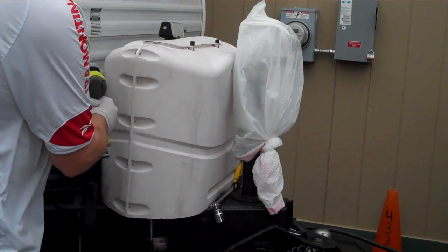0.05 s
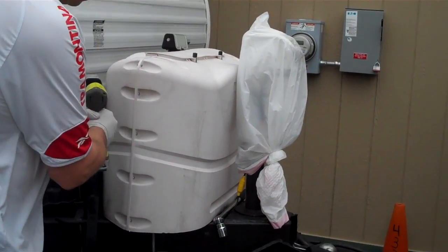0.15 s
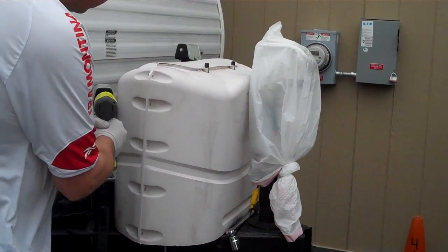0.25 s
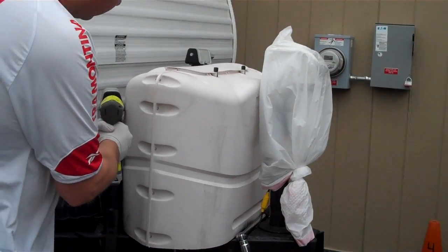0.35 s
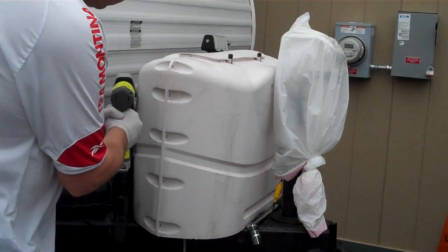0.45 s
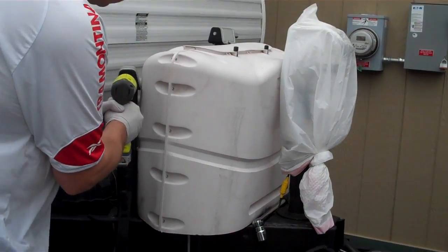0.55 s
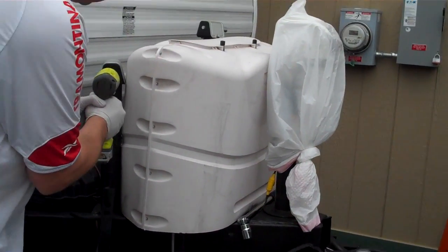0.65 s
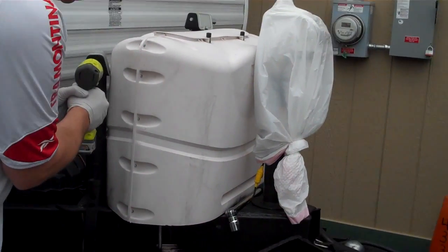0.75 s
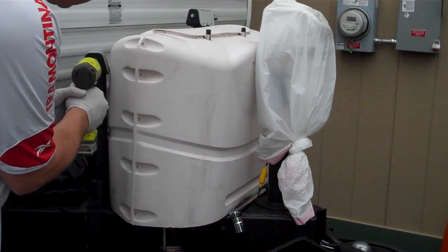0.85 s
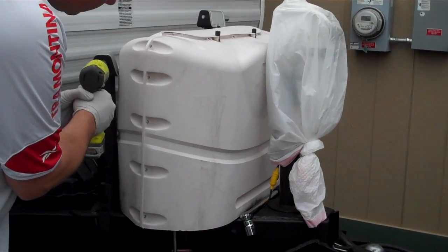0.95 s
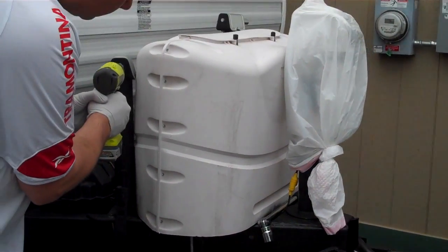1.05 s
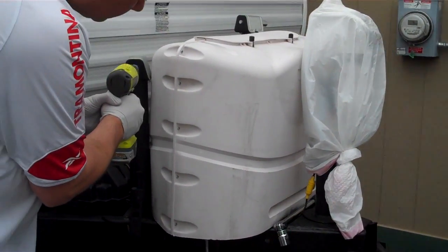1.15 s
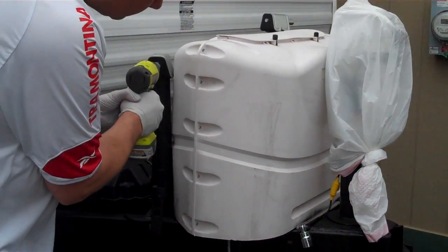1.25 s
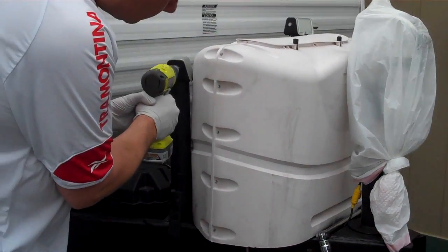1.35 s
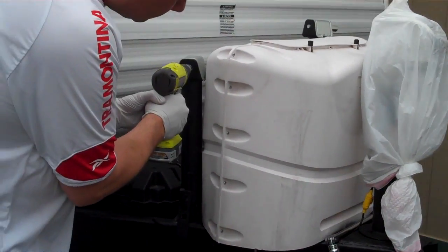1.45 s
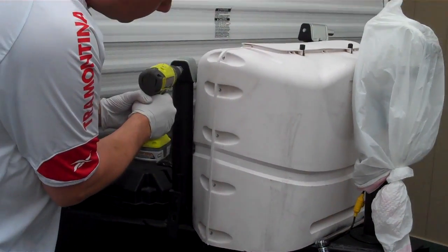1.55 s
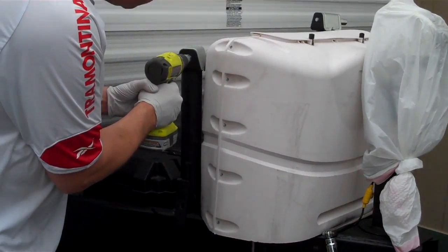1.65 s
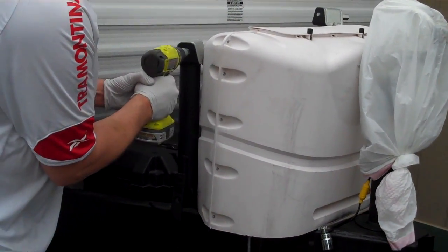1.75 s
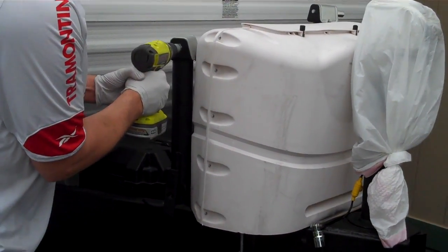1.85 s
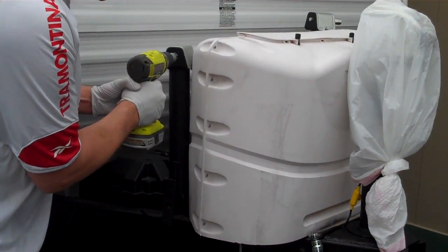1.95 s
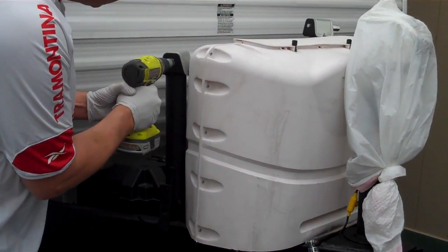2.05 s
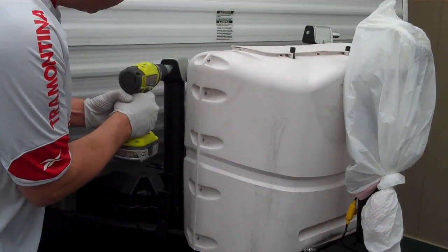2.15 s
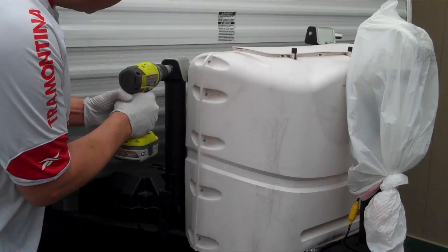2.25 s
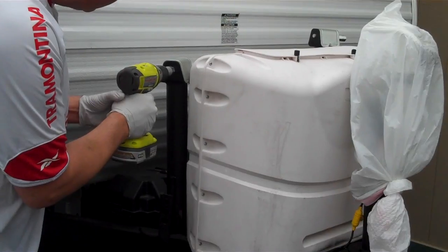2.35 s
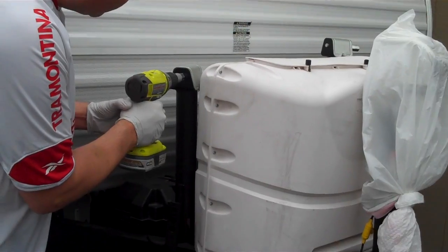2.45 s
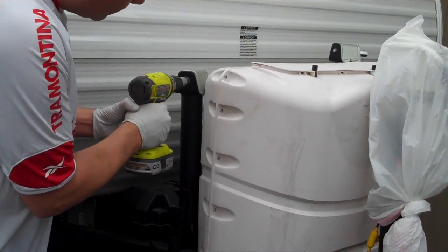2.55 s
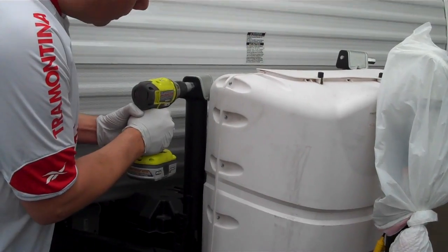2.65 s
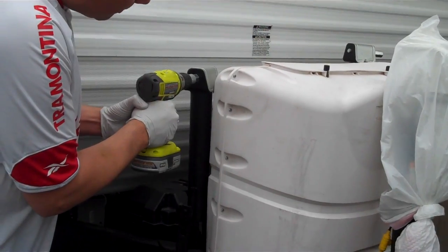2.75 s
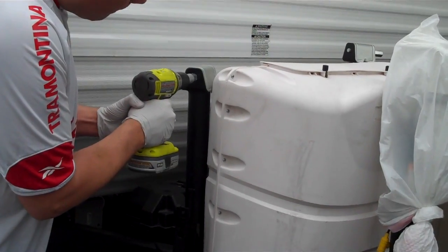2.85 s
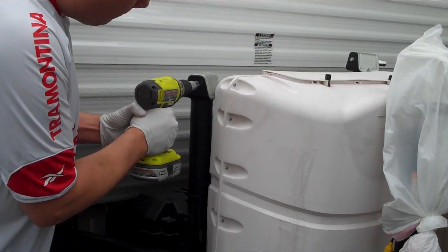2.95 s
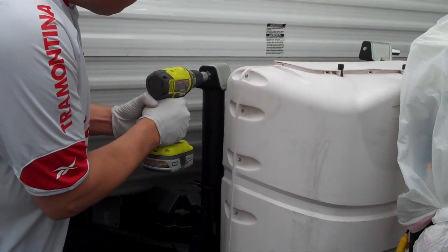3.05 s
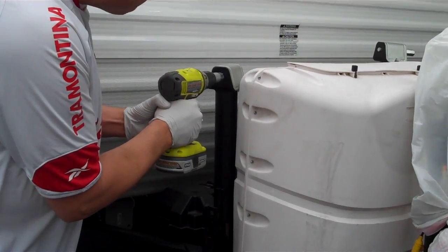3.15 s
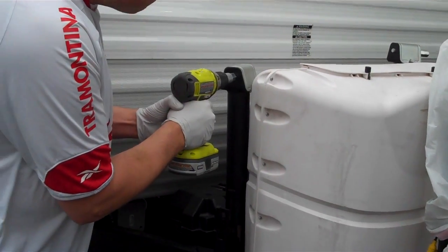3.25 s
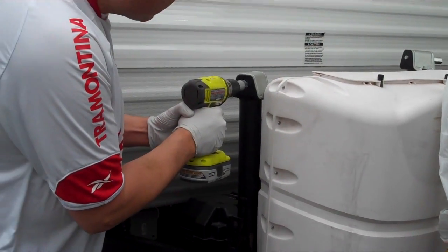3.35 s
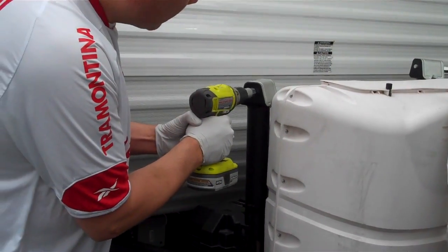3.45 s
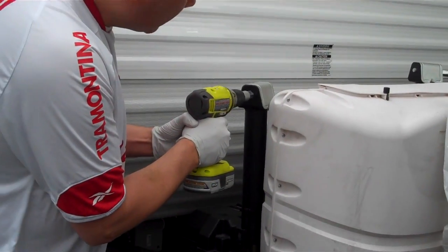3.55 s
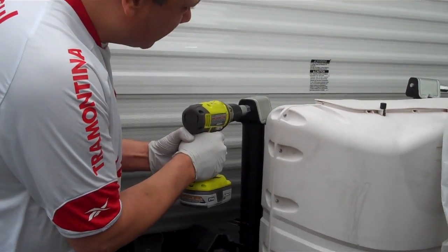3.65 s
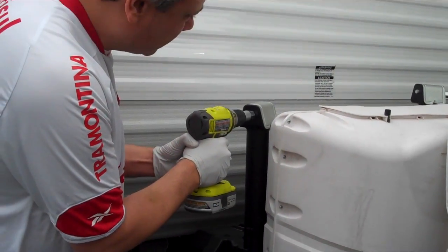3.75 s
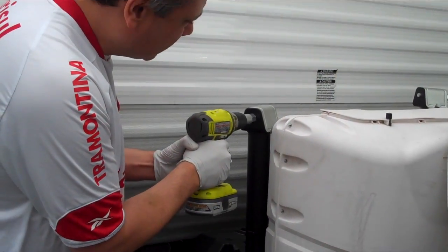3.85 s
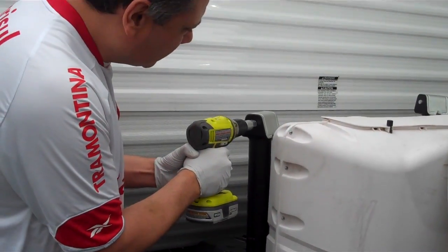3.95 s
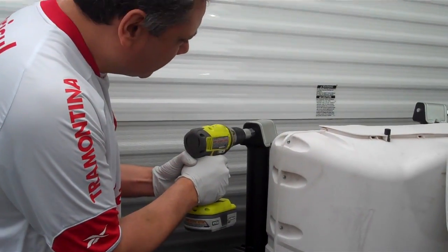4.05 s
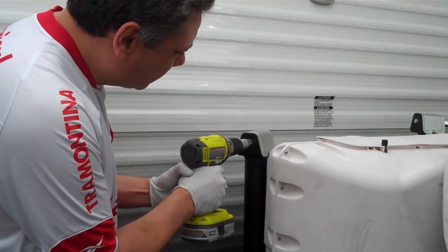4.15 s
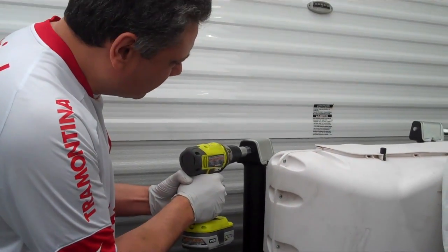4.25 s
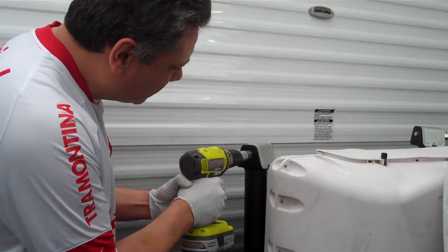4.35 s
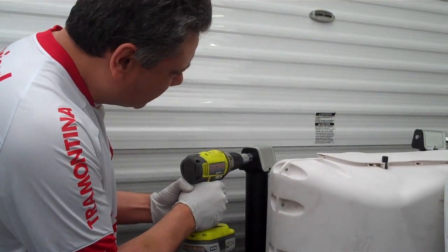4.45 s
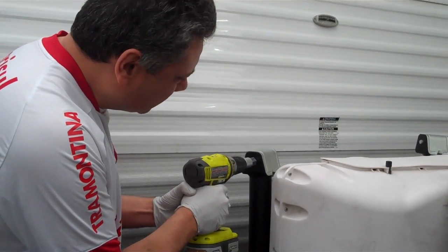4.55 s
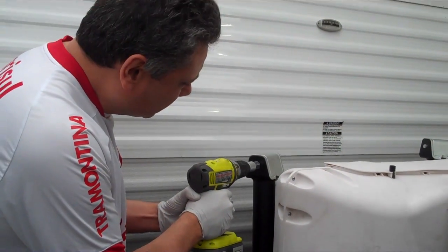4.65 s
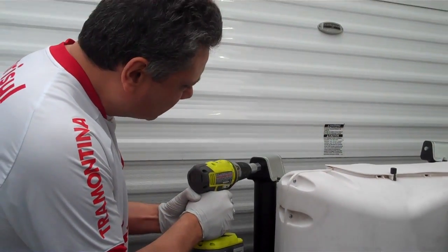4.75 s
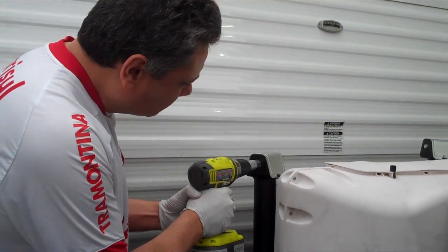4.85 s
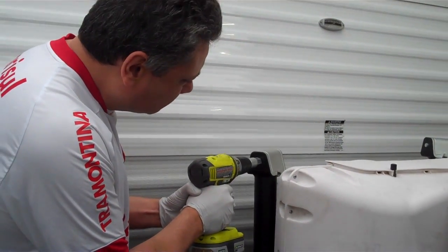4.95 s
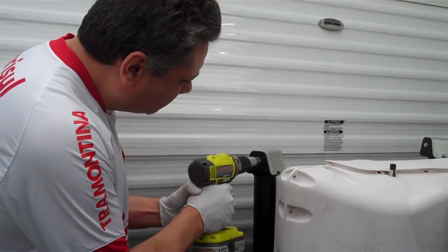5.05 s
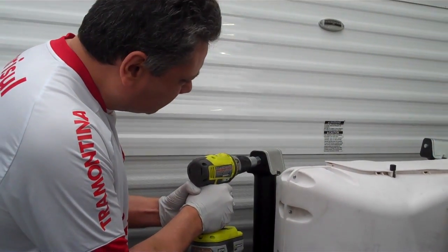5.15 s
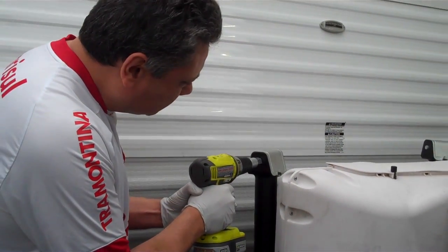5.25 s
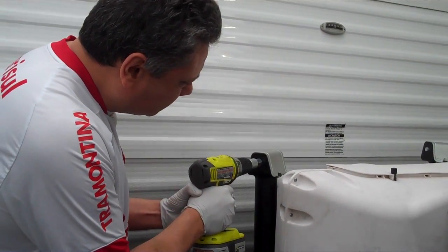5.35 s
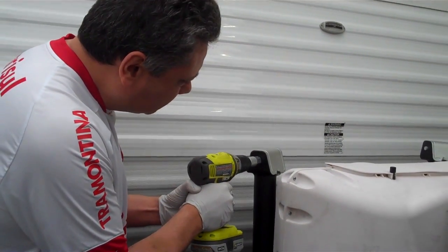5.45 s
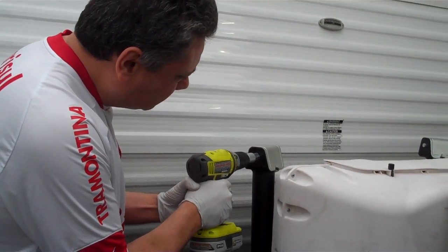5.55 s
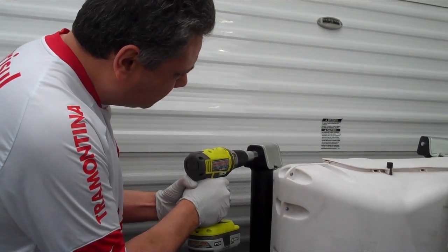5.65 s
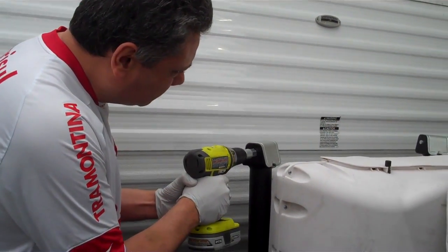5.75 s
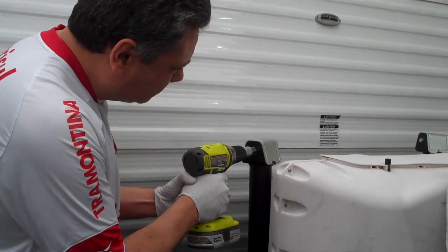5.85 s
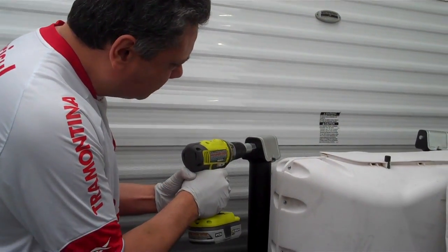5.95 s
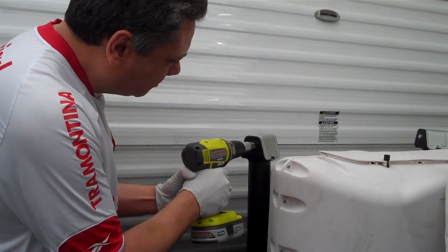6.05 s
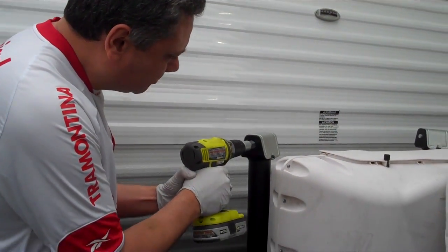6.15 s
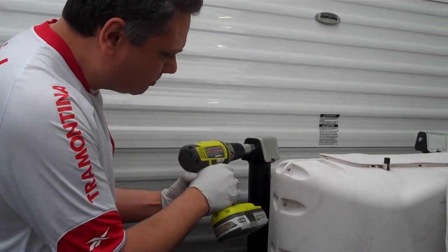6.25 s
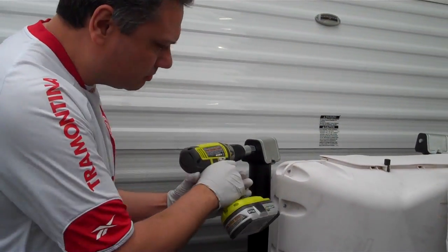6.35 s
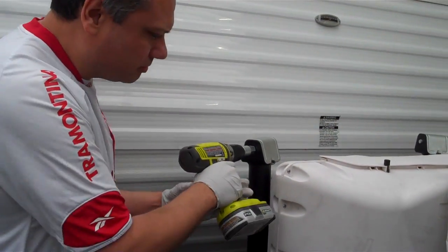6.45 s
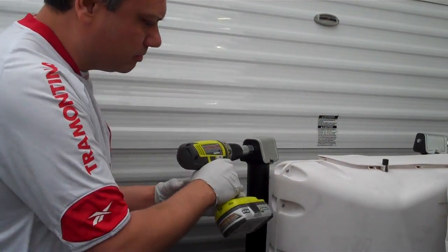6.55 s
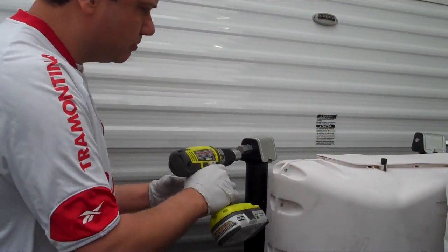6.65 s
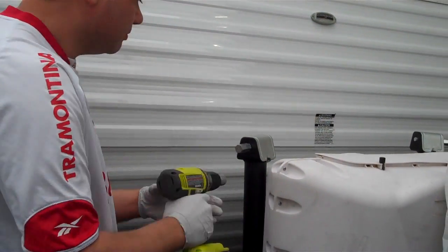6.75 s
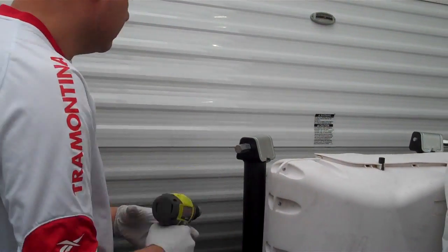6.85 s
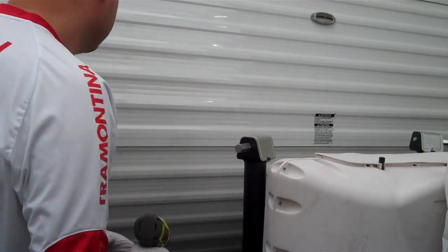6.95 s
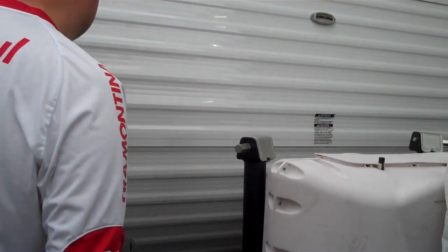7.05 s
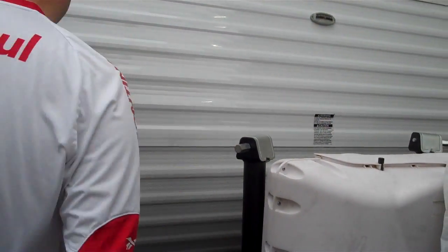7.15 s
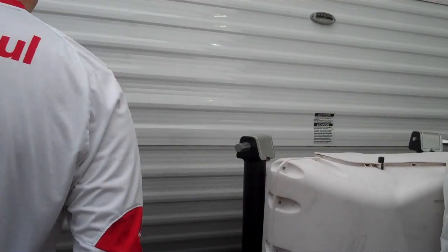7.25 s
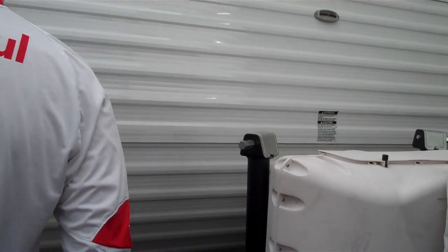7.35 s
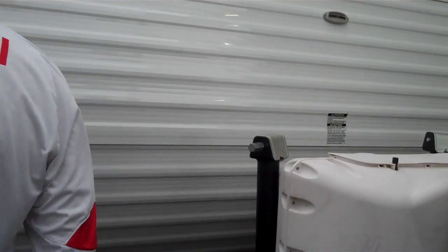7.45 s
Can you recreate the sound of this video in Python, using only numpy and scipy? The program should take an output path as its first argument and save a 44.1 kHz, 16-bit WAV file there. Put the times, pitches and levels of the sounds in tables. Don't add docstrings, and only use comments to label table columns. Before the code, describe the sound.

Outdoors, a cordless drill whines loudly and steadily, bogs down under load with rhythmic lurches, stops abruptly, then metal knocks and scrapes follow.

```python
import sys
import numpy as np
from scipy import signal
from scipy.fft import rfft, irfft
from scipy.io import wavfile
from scipy.ndimage import uniform_filter1d

SR = 44100
rng = np.random.default_rng(int(sys.argv[2]) if len(sys.argv) > 2 else 0)


def field_ratio(decibels):
    return 10 ** (np.asarray(decibels, dtype=float) / 20)


def wrap_up_sound(samples):
    columns = np.atleast_2d(samples).T
    tamed = np.clip(columns, -1, 1)
    steps = np.round(tamed * 32767).astype(np.int16)
    wavfile.write(sys.argv[1], SR, steps)


N = 330750

MESH = 11.25
# time in seconds, treble level in dB.
GEAR_RATTLE = [(0, -44), (.03, -35.5), (.8, -35), (1.78, -34), (3.56, -33.5), (4.62, -33), (5.23, -34.5),
               (6.46, -34), (6.485, -39.5), (6.52, -70)]


def curves(table):
    s, *columns = np.transpose(table)
    return [np.interp(np.arange(N) / SR, s, c) for c in columns]


def through(hz, body):
    f, db = np.transpose(body)
    return np.interp(np.log(hz), np.log(f), db)


def peaks(times, db, rise, fall):
    d = np.arange(N) / SR - np.c_[times]
    return np.c_[db] - np.where(d < 0, -rise * d, np.c_[fall] * d)


def unit(x):
    return x / np.sqrt(np.mean(x ** 2))


def band(x, lo_hz, hi_hz):
    return signal.sosfilt(signal.butter(2, [lo_hz, hi_hz], "bandpass", fs=SR, output="sos"), x)


def colour(x, spectrum, bumps=()):
    hz, db = np.transpose(spectrum)
    f = np.fft.rfftfreq(len(x), 1 / SR) + 1
    shape_db = np.interp(np.log(f), np.log(hz), db)
    for centre, width, gain_db in bumps:
        shape_db += gain_db * np.exp(-((f - centre) / width) ** 2)
    return irfft(rfft(x) * field_ratio(shape_db), len(x))


def walk(rate):
    k = max(int(SR / rate), 2)
    held = np.repeat(rng.standard_normal(N // k + 1), k)
    return unit(uniform_filter1d(uniform_filter1d(held, k), k)[:N])


def grit(scatter_db):
    return unit(rng.standard_normal(N) * field_ratio(scatter_db * walk(900)))


def ring(hz, t60, seconds=.25):
    t = np.arange(int(seconds * SR)) / SR
    return np.sin(2 * np.pi * hz * t) * np.exp(-np.log(1000) * t / max(t60, .003))


def add(out, s, x):
    i = int(s * SR)
    out[i:i + len(x)] += x[:len(out) - i]


def drill():
    # frequency in Hz, level in dB.
    mesh_body = [(1700, -40), (2250, -33), (2420, -36.5), (2500, -33), (2620, -37), (2760, -27),
                 (3050, -23.5), (3350, -43)]
    octave_body = [(2200, -52), (2800, -26), (3750, -23), (4250, -32), (4420, -28.5), (5370, -30),
                   (5520, -34), (6400, -41)]
    # time in seconds, tooth contact in dB, rotor slot tone in dB.
    tone_levels = [(0, -13, -55), (.055, 0, -36), (.075, 15, -39), (.1, -4, -47), (.2, 0, -40.5), (.6, 3, -35),
                   (.85, -10, -36), (1.05, -4, -33), (1.45, 1, -29.5), (1.7, -20, -32), (2.45, -28, -32.5),
                   (2.7, -2, -31), (3.1, -6, -32.5), (3.5, 1, -40.5), (3.9, -7, -41.5), (4.17, 8.5, -41),
                   (4.4, -2.5, -39), (6.5, -0.5, -42)]
    shaft_hz, load, torque, tight = shaft()
    turns = np.cumsum(shaft_hz) / SR
    noise, running_db = rattle(turns, load)
    contact_db, slot_db = curves(tone_levels)
    braked_db = -np.clip(175 - shaft_hz, 0, 25) * load
    patchy_db = .6

    mesh_db = through(MESH * shaft_hz, mesh_body) + contact_db + braked_db + patchy_db * walk(12)
    mesh_db += 4.5 * load * tight
    octave_db = through(2 * MESH * shaft_hz, octave_body) + patchy_db * walk(12)
    octave_db += -20 * (1 - torque)
    octave_db -= np.clip(165 - shaft_hz, 0, 60) / 12 * load + 9 * np.exp(-turns / 8)
    slot_db = slot_db + braked_db + 3 * np.exp(-turns / 200) * walk(20.1)

    on = np.clip((GEAR_RATTLE[-1][0] - np.arange(N) / SR) / 0.018, 0, 1)
    tones = whine(turns, load, running_db, shaft_hz, mesh_db, octave_db, slot_db)
    return noise * on, tones * on


def shaft():
    # time in seconds, shaft rate in Hz.
    speed = [(0, 298), (.28, 297), (.45, 302), (.8, 317.5), (1.45, 317.2), (1.63, 320.8), (2.45, 320),
             (2.65, 318.4), (3.33, 317.8), (3.65, 314.5), (3.85, 317.3), (4.05, 315), (4.65, 270),
             (5.07, 250), (5.495, 225.4), (6.1, 203.5), (6.38, 189), (6.45, 173)]
    free_hz, loaded_hz = 323, 224.5
    start_lag_hz, start_s, inrush_s = 215, .06, .055
    brake_at_s, brake_s = 6.452, .055
    crank_per_turn, tight_at_s, tight_sharp = 1 / 52.25, 5.452, 2.2
    hunt = .0012
    t = np.arange(N) / SR
    hz = curves(speed)[0]
    sag = np.maximum(max(np.transpose(speed)[1]) - 3 - hz, 0) * (t > 1)
    depth = .0055 + .00035 * sag
    crank = crank_per_turn * np.cumsum(hz * (1 - .29 * depth)) / SR
    angle = 2 * np.pi * (crank - crank[int(tight_at_s * SR)])
    tight = np.exp(tight_sharp * (np.cos(angle) - 1))
    hz = (hz - start_lag_hz * np.exp(-t / start_s)) * (1 - depth * tight)
    hz = hz * (1 + hunt * (1 + 5 * np.exp(-t / .45) + sag / 40) * walk(14))
    hz = np.maximum(hz * np.exp(-np.maximum(t - brake_at_s, 0) / brake_s), 50)
    load = np.clip((free_hz - hz) / (free_hz - loaded_hz), 0, 1) * (t > 1)
    torque = np.maximum(load, np.exp(-(t / inrush_s) ** 4))
    return hz, load, torque, tight


def whine(turns, load, running_db, shaft_hz, mesh_db, octave_db, slot_db):
    # multiple of shaft rate, level in dB running free, level in dB under load.
    lesser_tones = [(0.682, -60, -83), (1.005, -60.5, -87), (2.018, -54.5, -70), (2.697, -51.5, -76),
                    (3.003, -52.5, -66), (3.99, -50.5, -69), (4.897, -53, -63), (5.29, -59, -60),
                    (6.93, -48, -58), (8, -48, -62), (10.01, -68, -52.5), (14.27, -48, -53),
                    (15.14, -51, -48), (18.2, -58, -62), (23.13, -48, -45), (28.37, -53, -64),
                    (33.5, -58, -48)]
    slots = 12

    def tone(multiple, db, flutter_db, slip):
        phase = 2 * np.pi * multiple * turns + slip * walk(120) + 2 * np.pi * rng.random()
        return np.sqrt(2) * field_ratio(db + flutter_db * walk(25)) * np.sin(phase)

    out = tone(MESH, mesh_db, 1.8, .3) + tone(2 * MESH, octave_db, 2.3, .55)
    out += tone(slots, slot_db + 1 * (slot_db < -37), 1.2, .12)
    out += tone(MESH + 1.08, mesh_db - 15 - 12 * (1 - load), 2.3, 0.42)
    out += unit(band(rng.standard_normal(N), 23, 346)) * tone(2 * MESH, octave_db - 5.5, 0.33, 0.11)
    settling_db = 8 * np.exp(-np.arange(N) / SR / .5)
    settling_db += np.clip((185 - shaft_hz) * load, 0, 25)
    for multiple, free_db, loaded_db in lesser_tones:
        db = free_db + load * (loaded_db - free_db) + running_db - settling_db
        out += tone(multiple, db, 4.0, 0.48 + .05 * multiple)
    off = (.68 * shaft_hz - 176) / 21
    return out + tone(.68, -60 - 12 * off ** 4 + running_db - 15 * (load == 0), 2.5, .1)


def rattle(turns, load):
    # frequency in Hz, level in dB per Hz.
    free_spectrum = [(59, -32), (100, -34.5), (287, -21.5), (325, -18), (556, -23.5), (630, -17),
                     (1120, -12.5), (1270, -7), (1500, -10), (2180, -9), (3360, -9), (3730, -9),
                     (4130, -10), (9070, -13), (14000, -21.5)]
    loaded_spectrum = [(59, -62), (100, -43), (151, -42), (186, -29), (425, -15), (534, -21.5),
                       (859, -11.5), (1560, -18), (2000, -14), (2320, -10.5), (3580, -13.5), (4680, -6),
                       (6120, -10.5), (9070, -11.5), (14000, -20)]
    # frequency in Hz, width in Hz, gain in dB.
    shell_modes = [(5650, 170, -1.5), (6470, 270, -3), (7250, 430, -1), (8840, 410, 0.5), (10570, 240, -1),
                   (7770, 270, 1), (4580, 88, -0.5), (2300, 350, 1.5)]
    tube_ring, housing_ring, cap_ring = (2050, 310), (2954, 430), (8100, 730)  # (Hz, width Hz)
    treble_db, t = curves(GEAR_RATTLE)[0], np.arange(N) / SR
    starting, settled_s = np.exp(-t / 0.16), np.minimum(t, 4)

    low_db = 6 - 1.5 * settled_s - 5.5 * load - 15 * starting
    tube_db = -35.5 - 4 * settled_s + 14.5 * load * t / GEAR_RATTLE[-1][0] - 14 * np.exp(-t / 0.38)
    mesh_hz = MESH * np.gradient(turns) * SR
    near_mesh = np.exp(-((mesh_hz - housing_ring[0] + 150) / 670) ** 2)
    housing_db = -49 + 17 * near_mesh - 7 * starting
    cap_db = housing_db - 11

    carrier = 2 * np.pi / 20.5 * turns
    throb_db = .9 * np.sin(carrier) + .6 * np.sin(2 * carrier + 1) + .5 * np.sin(4 * carrier + 2) + .4 * walk(6)

    source = grit(0.64)
    free = colour(source, free_spectrum, shell_modes)
    loaded = colour(source, loaded_spectrum, shell_modes)
    free /= np.std(band(free, 6200, 13000))
    loaded /= np.std(band(loaded, 6200, 13000))
    body = (1 - load) * free + load * loaded
    low = signal.sosfilt(signal.butter(2, 1700, fs=SR, output="sos"), body)
    body += low * (field_ratio(low_db + 1.15 * walk(9.8)) - 1) * 0.75
    rings = np.zeros(N)
    for db, (hz, width) in ((tube_db, tube_ring), (housing_db, housing_ring), (cap_db, cap_ring)):
        rings += field_ratio(db + 1.0 * walk(18)) * unit(band(grit(1.0), hz - width / 2, hz + width / 2))
    running_db = np.minimum(treble_db - np.median(treble_db), 0)
    return field_ratio(throb_db) * (field_ratio(treble_db) * body + field_ratio(running_db) * rings), running_db


def knocks():
    # start in seconds, peak level in dB, click frequency in Hz.
    blows = [(6.7585, -45.2, 1227), (6.7974, -30.9, 1281), (6.8132, -36.8, 1496), (6.8214, -25.7, 1087),
             (6.8359, -35.4, 1518), (6.8549, -36.6, 1022), (6.9328, -40.2, 990), (6.9463, -21.7, 1281),
             (6.9608, -35.5, 1765), (6.9801, -32.6, 1765), (6.9859, -35.2, 1464), (6.9979, -25.5, 2174),
             (7.0102, -14.1, 2260), (7.0231, -23.9, 1647), (7.0347, -34.3, 1636), (7.043, -31.6, 1754),
             (7.0608, -38.8, 2788), (7.0814, -40.4, 2788), (7.1436, -33.5, 2885), (7.1554, -38.2, 2900),
             (7.213, -45.1, 3692), (7.2362, -46.6, 1539), (7.2676, -43.5, 1561), (7.444, -51.3, 2960)]
    # ratio to the click frequency, level in dB.
    click_modes = [(1, 14), (1.9, 6.5), (3.1, -28), (4.6, -40)]
    bounce_s, bounce_db = .0027, -16
    out = np.zeros(N)
    t = np.arange(4096) / SR
    for s, db, hz in blows:
        rattle_db = min(-13 - 0.11 * (db + 31), -8)
        thud_db = -10 if hz < 1300 else -27
        click = sum(field_ratio(d) * ring(hz * ratio, .005, seconds=t[-1]) for ratio, d in click_modes)
        click = band(click, 870, 12000)
        click /= np.abs(click).max()
        chance = rng.standard_normal(4096)
        loose = band(chance, 0.61 * hz, 1.47 * hz) + field_ratio(-15.5) * band(chance, 2.4 * hz, 9000)
        add(click, 0, field_ratio(rattle_db) * unit(loose) * np.exp(-np.log(1000) * t / 0.042))
        add(click, 0, field_ratio(thud_db) * ring(464, 0.026, seconds=t[-1]))
        add(out, s, field_ratio(db) * click)
        add(out, s + bounce_s, field_ratio(db + bounce_db) * click)
    return out


def scrape():
    # time in seconds, peak level in dB, treble tilt in dB, fade in dB per second.
    strokes = [
        (6.55, -47, -12, 55),
        (6.762, -54, 4, 400),
        (6.815, -43, -9.5, 88),
        (7.0, -52, -7, 40),
        (7.155, -51, -12, 600),
    ]
    rise_db_s, rest_db, rest_tilt_db = 217, -62, -20
    s, db, tilts, fade = np.transpose(strokes)
    levels = np.vstack([peaks(s, db, rise_db_s, fade), np.full(N, rest_db)])
    level_db = levels.max(axis=0)
    tilt_db = np.append(tilts, rest_tilt_db)[levels.argmax(axis=0)]
    source = band(grit(2.4), 150, 14000)
    sound = unit(band(source, 650, 3950))
    sound += field_ratio(-13.0) * unit(band(source, 180, 430))
    sound += field_ratio(tilt_db) * unit(band(source, 3400, 9300))
    on = np.clip((np.arange(N) / SR - s[0] + 0.083) / 0.04, 0, 1)
    return on * field_ratio(level_db - 3.0) * sound


def jolts():
    # start in seconds, peak level in dB, frequency in Hz, decay time t60 in seconds.
    bumps = [(0.219, -29.5, 814, 0.06), (0.271, -36, 930, 0.055), (0.442, -27.5, 977, 0.025),
             (0.511, -39, 288, 0.06), (0.929, -26, 855, 0.053), (1.031, -25.5, 912, 0.17),
             (1.329, -34, 644, 0.034), (1.699, -29.5, 785, 0.11), (1.989, -31, 795, 0.085),
             (2.028, -31, 835, 0.098), (2.539, -46, 890, 0.055), (3.667, -28.5, 860, 0.059),
             (6.65, -36, 72.7, 0.029), (7.294, -40, 149, 0.041)]
    out = np.zeros(N)
    for s, db, hz, t60 in bumps:
        bump = ring(hz, t60) + 0.35 * ring(0.43 * hz, t60) + 0.34 * ring(186, 0.065)
        push = np.minimum(np.arange(len(bump)) / (0.0038 * SR), 1)
        add(out, s, field_ratio(db) * bump * push)
    return out


def walls(x):
    t = np.arange(SR) / SR

    def echo(t60):
        tail = rng.standard_normal(SR) * np.exp(-np.log(1000) * t / t60) * (t > .004)
        return unit(band(tail, 240, 5800))

    echoes = field_ratio(-15) * echo(0.12) + field_ratio(-24) * echo(0.67)
    return x + signal.fftconvolve(x, echoes / np.sqrt(SR))[:N]


def yard():
    # frequency in Hz, level in dB per Hz.
    hush_spectrum = [(35, -26), (60, -17.5), (153, -6.5), (303, -8), (348, -10.5), (1400, -6.5),
                     (2210, -23), (2970, -31), (5490, -38), (11100, -33), (14000, -53)]
    # time in seconds, rumble peak in dB.
    hand_shifts = [(.27, -50), (.44, -54), (1.06, -66), (1.34, -63), (2.02, -54), (4.41, -76), (4.82, -63),
                   (5.89, -68), (6.27, -68), (6.56, -56), (6.66, -56), (6.83, -61), (7.29, -57),
                   (7.45, -58)]
    shift_db_s = 190
    hush = colour(rng.standard_normal(N), hush_spectrum)
    hush *= field_ratio(-53 - 8.0 + 0.95 * walk(3.18)) / np.std(band(hush, 100, 14700))
    shifts_db = peaks(*np.transpose(hand_shifts), shift_db_s, [shift_db_s]).max(axis=0)
    grip_db = -69 - 3.2 * np.arange(N) / SR
    hands_db = np.maximum(shifts_db, grip_db)
    rumble = unit(band(band(rng.standard_normal(N), 35.3, 143), 34.9, 140))
    return hush + field_ratio(hands_db - 1.0 + 3.7 * walk(9)) * rumble


def starve(x):
    # frequency in Hz, share of patches lost.
    lost_share = [(7000, 0), (10000, .05), (12000, .17), (14000, .22)]
    hz, _, z = signal.stft(x, SR, nperseg=1024)
    field = uniform_filter1d(rng.random(z.shape[1:]), size=3, axis=0)
    field = uniform_filter1d(field, size=8, axis=1)
    rank = field.argsort(axis=1).argsort(axis=1) / field.shape[1]
    dropped = rank < np.interp(hz, *np.transpose(lost_share))[:, None]
    return signal.istft(z * np.where(dropped, field_ratio(-30), 1), SR, nperseg=1024)[1][:, :N]


def scene():
    noise, tones = drill()
    hiss = field_ratio(-76.0) * unit(band(rng.standard_normal(N), 4000, 15000))
    echoed = walls(noise + .4 * tones + knocks() + scrape())
    return (echoed + .6 * tones + jolts() + yard() + hiss)[None]


def band_limit(x):
    return signal.sosfilt(signal.butter(12, 13940, fs=SR, output="sos"), x)


def record(dry):
    after = np.maximum(np.arange(N) / SR - 6.49, 0) / 0.067
    offset = 0.04 * after ** 2 * np.exp(-1.6 * after) - .0005
    top_cut = signal.ellip(10, .2, 80, 13900, fs=SR, output="sos")
    mix = signal.sosfilt(top_cut, starve(dry)) + offset
    return band_limit(mix)


dry = scene()
out = record(dry)
wrap_up_sound(out)
```